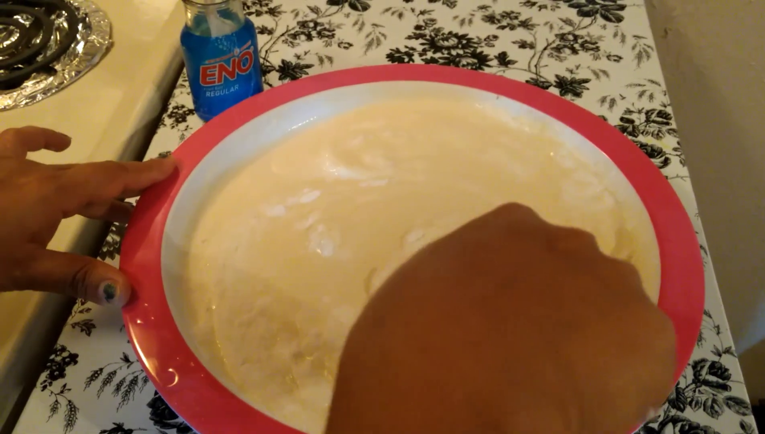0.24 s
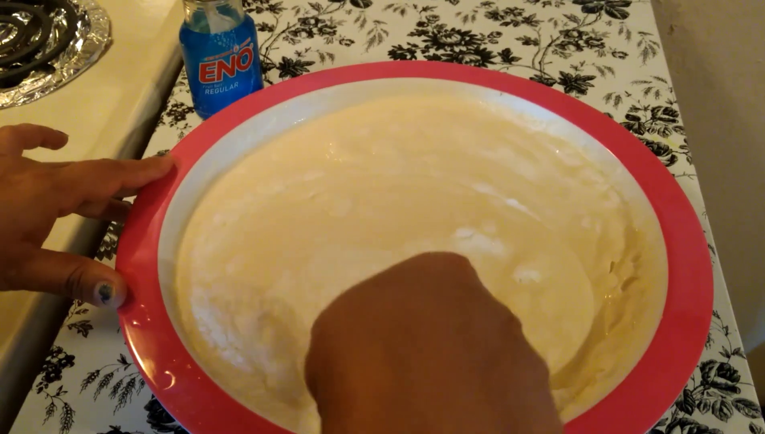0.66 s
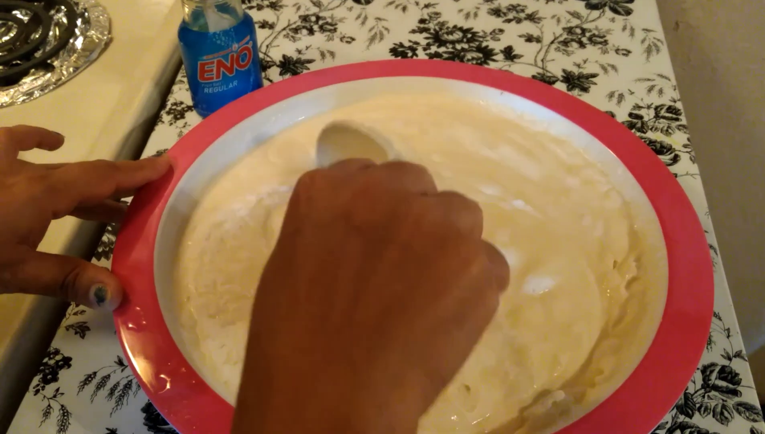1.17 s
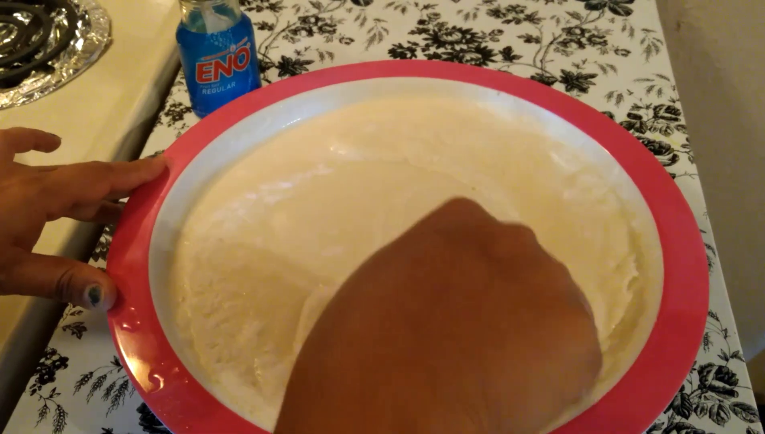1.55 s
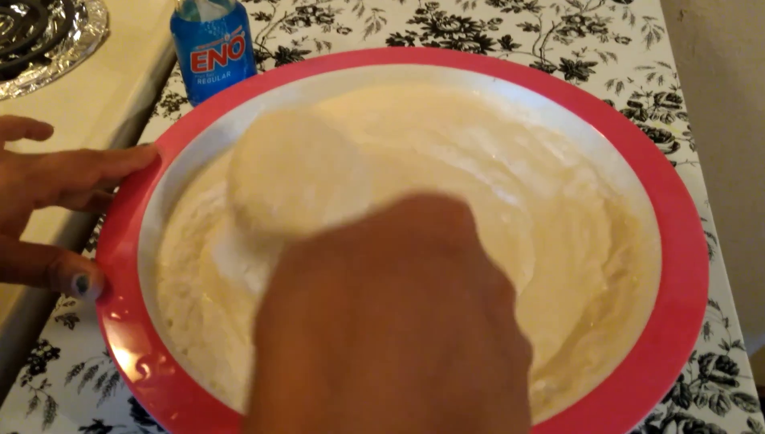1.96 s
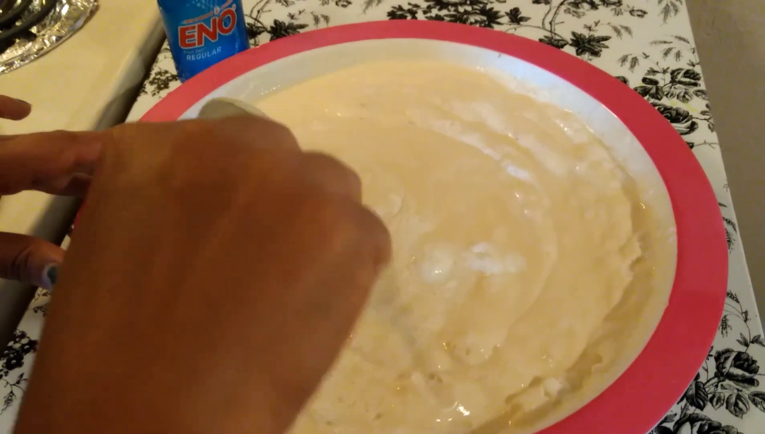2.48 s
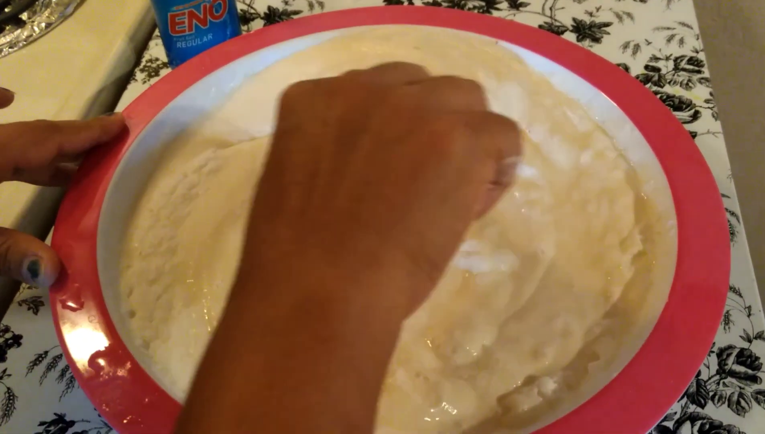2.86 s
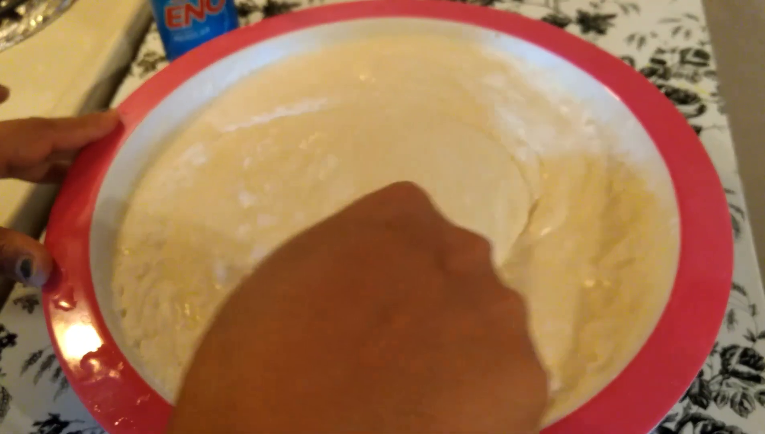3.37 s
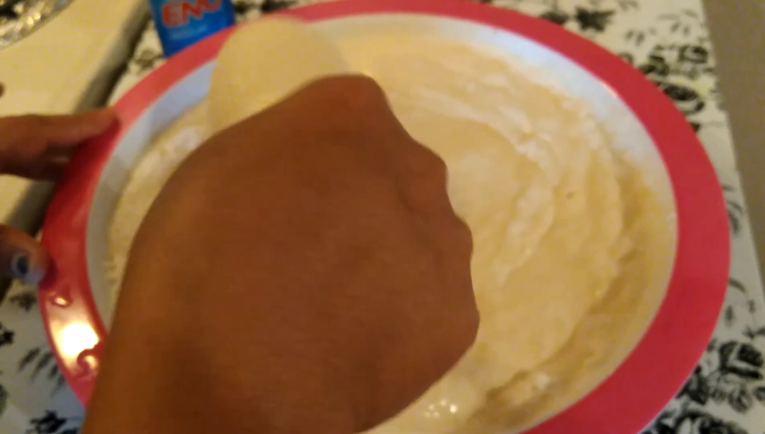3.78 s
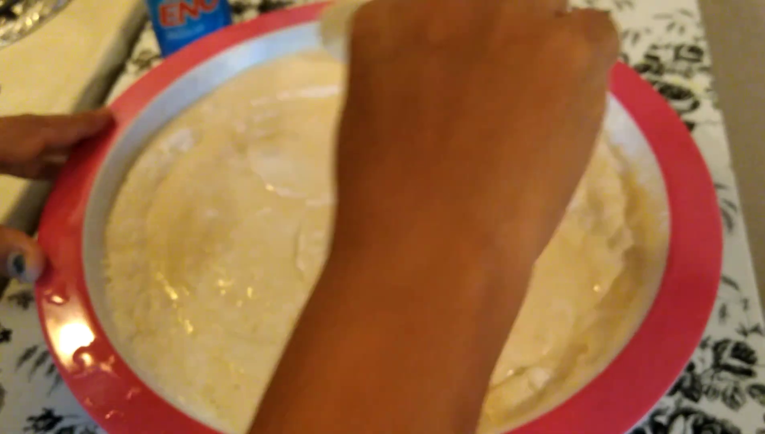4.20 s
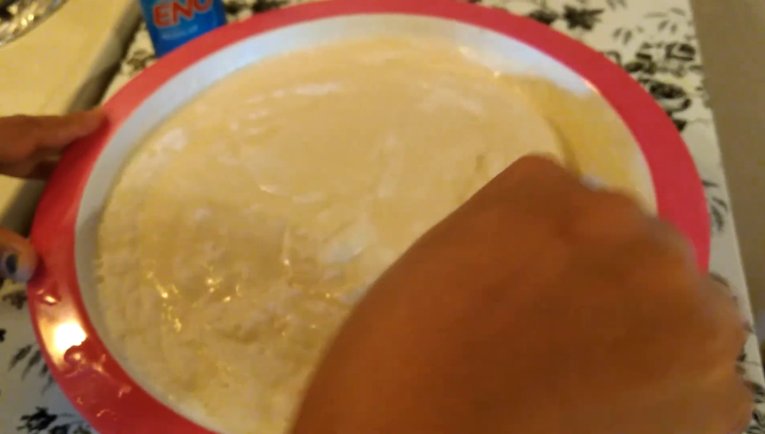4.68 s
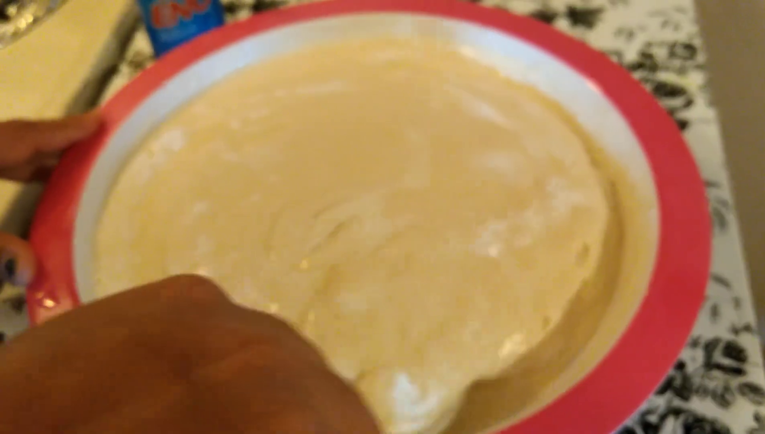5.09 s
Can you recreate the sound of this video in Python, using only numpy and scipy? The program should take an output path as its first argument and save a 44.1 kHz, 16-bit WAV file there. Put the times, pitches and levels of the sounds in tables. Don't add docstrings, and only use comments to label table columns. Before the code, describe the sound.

In a quiet kitchen, a spoon drags and taps along a damped plastic bowl wall while thick batter smears, squelches and fizzes softly. Two heavy knocks, around 1.4 and 2.6 seconds, stand out with short low shudders. Small wet smacks and pops continue to the end, over faint worktop rumble and refrigerator hum, heard close by a small stereo microphone.

```python
import sys
import numpy as np
from scipy import signal
from scipy.fft import rfft, irfft, next_fast_len
from scipy.io import wavfile
from scipy.ndimage import uniform_filter1d, map_coordinates

SR = 44100
rng = np.random.default_rng(int(sys.argv[2]) if len(sys.argv) > 2 else 0)


def persist_wave(psi):
    counts = np.round(np.clip(psi, -1, 1) * 32767).astype(np.int16)
    wavfile.write(sys.argv[1], SR, np.atleast_2d(counts).T)


def voltage_ratio(decibels):
    exponent = np.asarray(decibels, float) / 20
    return 10 ** exponent


N = 235494

# [t/s, peak level/dB, thud f/Hz, hard edge level/dB, shudder T60/s]
BLOWS = [(0.001, -37, 550, -26, 0.39), (0.055, -37, 470, -17, 0.12), (1.367, -21, 480, -11, 0.17),
         (1.414, -33, 438, -18.5, .3), (1.472, -39, 270, -20, .14), (1.628, -44, 315, -10.5, 0.13),
         (2.622, -27.5, 492, -6, 0.24), (3.036, -42, 530, -4.5, 0.36), (3.146, -44, 522, -11.5, 0.22),
         (3.35, -40, 495, -5, 0.17), (4.333, -39, 356, -1.5, .4)]


def rms_one(x):
    return x / np.sqrt(np.mean(x ** 2) + 1e-20)


def filtered(x, hz, kind, order=2):
    return signal.sosfilt(signal.butter(order, hz, kind, fs=SR, output="sos"), x)


def drift(rate):
    coarse = np.arange(0, N + 64, 64)
    smooth = map_coordinates(rng.standard_normal(400), [coarse / SR * rate], order=3)
    return rms_one(np.interp(np.arange(N), coarse, smooth))


def ring(force, hz, t60):
    radius = voltage_ratio(-60 / (t60 * SR))
    angle = 2 * np.pi * hz / SR
    return signal.lfilter([0, np.sin(angle)], [1, -2 * radius * np.cos(angle), radius ** 2], force + 1e-18)


def grains(per_s, spread_db):
    sizes = voltage_ratio(spread_db * np.minimum(rng.exponential(1, N), 3.6)) * rng.choice([-1, 1], N)
    return rms_one(sizes * (rng.random(N) < per_s / SR))


def coloured(sources, spectrum, patchy_db):
    out = 0
    together = drift(9)
    band_edges = 25 * 2 ** np.arange(0, 9.6, .5)
    hz, level = np.transpose(spectrum)
    for k, (low, high) in enumerate(zip(band_edges, band_edges[1:])):
        flicker = patchy_db * (.6 * together + .8 * drift(16))
        if hz[0] < high and low < hz[-1]:
            band = filtered(sources[k % 2], [low, high], "band")
            band_db = np.interp(np.log(low * high) / 2, np.log(hz), level)
            out = out + voltage_ratio(band_db + flicker) * band
    return rms_one(out)


def delayed(x, lag_s):
    size = next_fast_len(N + 256)
    phase = np.exp(-2j * np.pi * np.fft.rfftfreq(size, 1 / SR) * lag_s)
    return irfft(rfft(x, size) * phase, size)[..., :N]


def add(track, s, piece):
    i = max(round(s * SR), 0)
    track[i:i + len(piece)] += piece[:N - i]


def in_time(rows):
    s, *columns = np.transpose(rows)
    return [np.interp(np.arange(N) / SR, s, c) for c in columns]


def pressure():
    # [t/s, pressure level/dB, height on the wall as brightening/dB]
    strokes = [(0.0, -57, 0.5), (0.25, -59, -2.5), (0.5, -66, 0.5), (0.74, -76.5, -4), (0.95, -92, -9),
               (1.38, -83, -6), (1.54, -63.5, -4), (1.75, -70, -1.5), (2.44, -71, -4.5),
               (2.62, -68.5, -3.5), (3.05, -64, 0), (3.34, -58.5, -2), (3.43, -72, -5.5), (3.75, -75, -1.5),
               (4.1, -112, -13), (4.38, -70, -7.5), (4.53, -66.5, 3.5), (5.05, -71, -3.5)]
    lift_off_db_per_s = 49
    press_db, height_db = in_time(strokes)
    since_last_s = np.maximum(np.arange(N) / SR - strokes[-1][0], 0)
    return press_db - lift_off_db_per_s * since_last_s, height_db


def bowl(modes, per_s):
    slips = grains(per_s, spread_db=3.5) * voltage_ratio(drift(55))
    wall = 0
    for k, (hz, db, t60) in enumerate(modes):
        wall = wall + (-1) ** k * voltage_ratio(db) * ring(slips, hz, t60)
    return wall / np.sqrt(uniform_filter1d(wall ** 2, size=3000) + 1e-12)


def wall_body():
    push = np.zeros(N)
    for s, db, *_ in BLOWS:
        add(push, s + 0.0018, voltage_ratio(db - 5) * np.hanning(40) / 20)
    return .8 * ring(push, 328, .05) + .4 * ring(push, 245, .12) - .6 * ring(push, 490, .1)


def crack(edges):
    edges = filtered(edges + 1e-18, 2600, "low")
    lower = 0.8 * ring(edges, 962, 0.016) - 0.63 * ring(edges, 1150, 0.019)
    return lower + 0.47 * ring(edges, 1466, 0.017) + 0.72 * ring(edges, 1900, 0.0056)


def knocks():
    # [t/s, peak level/dB, thud f/Hz, hard edge level/dB]
    taps = [(0.08, -56, 880, 4), (0.121, -61, 428, -10), (0.189, -46.5, 455, -1), (0.223, -56, 423, 7),
            (0.289, -49.5, 1220, -25), (0.314, -45, 1110, -4), (0.329, -45, 607, -2.5),
            (0.359, -42.5, 1020, -8), (0.372, -53, 990, 5.5), (0.414, -48.5, 1150, -5),
            (0.493, -49.5, 950, -1), (0.553, -51, 1100, 7.5), (1.666, -53, 507, -9), (1.975, -58, 570, 9),
            (2.161, -53, 1150, 2.5), (2.793, -45.5, 710, -4), (2.82, -54, 790, -3), (2.976, -52, 345, 3),
            (3.134, -45, 550, -7), (3.161, -47, 485, 2), (3.277, -47, 524, -21), (3.305, -46, 706, -10),
            (4.539, -57, 750, -24), (4.665, -64, 750, 13), (4.777, -70, 560, -13),
            (5.092, -55.5, 1070, 9.5), (5.178, -50.5, 486, 2)]
    blow_shudder_db, tap_shudder_db, tap_t60_s = -14, -15, 0.098
    heavy_from_db, heavy_contact_s = -32, .0006
    hits = [(*blow, blow_shudder_db) for blow in BLOWS]
    hits += [(*tap, tap_t60_s, tap_shudder_db) for tap in taps]
    thuds, edges, deep, middle, high = np.zeros((5, N))
    t = np.arange(SR // 2) / SR
    for s, db, hz, edge_db, t60, shudder_db in hits:
        cycles = hz * (.62 * t + .95 * .004 * (1 - np.exp(-t / .004)))
        swell = (t * hz / 1.5) ** 2 * np.exp(2 - 2 * t * hz / 1.5)
        add(thuds, s + 0.00042, voltage_ratio(db) * swell * np.sin(2 * np.pi * (cycles + rng.random())))
        contact = np.hanning(3 + round(heavy_contact_s * SR) * (db > heavy_from_db))
        add(edges, s + 0.001243, voltage_ratio(db + edge_db) * contact / contact.sum())
        dying = voltage_ratio(db + shudder_db - 60 * t / t60) * (1 - np.exp(-(t / .006) ** 2))
        add(deep, s, voltage_ratio(0.67 * (db + 32.5)) * dying * np.exp(t / 0.31))
        add(middle, s, dying)
        add(high, s, voltage_ratio(edge_db + 5.0) * dying * np.exp(-t / 0.022))
    thuds = filtered(thuds + wall_body(), 170, "high")
    return thuds + crack(edges), deep, middle, high


def drag(press_db, height_db):
    # [f/Hz, level/dB, T60/s]
    deep_modes = [(224, -2, 0.072), (250, -2.5, 0.21), (315, 1, 0.096), (373, -1, 0.025)]
    middle_modes = [(405, 1.5, 0.019), (495, -0.8, 0.071), (553, -3, 0.041), (663, 0, 0.019)]
    high_modes = [(797, 10, 0.023), (962, 7.5, 0.045), (1118, 15, 0.01), (1432, -2, 0.048),
                  (1800, -12, 0.024)]
    strikes, deep, middle, high = knocks()
    deep = deep + voltage_ratio(press_db - height_db - 2.5)
    middle = middle + voltage_ratio(press_db - 2.5)
    high = high + voltage_ratio(press_db + height_db - 2)
    wall = deep * bowl(deep_modes, 700) + middle * bowl(middle_modes, 800) + high * bowl(high_modes, 900)
    return strikes + wall


def smacks():
    # [t/s, peak level/dB, centre f/Hz, length/s]
    wet_smacks = [(0.055, -54, 2430, .049), (0.416, -50, 2600, 0.071), (0.551, -55, 4620, .03),
                  (0.662, -53, 6130, .036), (1.116, -49.5, 6340, 0.013), (1.651, -48, 3920, 0.032),
                  (2.163, -44, 4800, .03), (2.4794, -55, 4170, .022), (2.644, -52, 2550, .025),
                  (2.796, -52, 2980, .04), (3.352, -46, 2290, .025), (3.58, -55, 4280, .017),
                  (4.551, -48.5, 2470, 0.02), (4.744, -53.5, 4590, 0.029), (4.779, -49, 2370, 0.019),
                  (4.8494, -46, 3820, 0.095), (4.947, -59, 4080, 0.027), (5.181, -55, 2600, 0.037)]
    # [t/s, peak level/dB, centre f/Hz, length/s]
    snaps = [
        (1.116, -52, 8120, 0.015),
        (2.162, -52, 8120, 0.016),
        (2.625, -55, 8200, 0.02),
    ]
    # [t/s, peak level/dB, centre f/Hz, length/s]
    pops = [
        (0.0834, -53, 2060, .025),
        (1.5094, -53.5, 2630, .048),
        (2.68, -50, 4600, .025),
        (4.3325, -55, 2600, .04),
        (4.3325, -55, 1980, .03),
        (4.629, -52, 2240, .036),
        (5.0945, -45, 2120, .025),
        (5.101, -53, 2550, .04),
    ]
    out = np.zeros(N)
    t = np.arange(SR // 10) / SR
    for rows, octaves in [(wet_smacks, 1.46), (snaps, 3.4), (pops, .5)]:
        half = 2 ** (octaves / 2)
        for s, db, hz, length, in rows:
            burst = rng.standard_normal(len(t)) * voltage_ratio(-60 * t / length) * (1 - np.exp(-t / .0003))
            burst = filtered(burst, [hz / half, min(hz * half, 19000)], "band")
            add(out, s, voltage_ratio(db + 5) * burst / np.abs(burst).max())
    return out


def batter(press_db, height_db):
    # [t/s, level/dB]
    stir = [(0.0, -65.5), (0.46, -64.5), (0.85, -73.5), (1.4, -72), (1.78, -61.5), (1.96, -66.5),
            (2.57, -67.5), (2.86, -63), (3.4, -67), (3.81, -74), (4.18, -77.5), (4.36, -72), (4.67, -65.5),
            (4.85, -66.5), (5.24, -71.5), (5.34, -73.5)]
    # [f/Hz, level per Hz/dB]
    squelch_spectrum = [(700, -14), (1300, -10), (2200, 10.5), (3000, -6.5), (4200, -9.5)]
    smear_spectrum = [(2000, -7.5), (3500, 1.5), (4600, 17.5), (6500, -9), (9000, -35), (14000, -50)]
    fizz_spectrum = [(2000, -14), (5000, -4.5), (8000, 5.5), (11000, -5), (16000, -4.5)]
    speed_db, = in_time(stir)
    speed_db = speed_db - speed_db.mean()
    squelch_db = -71.5 + 0.32 * speed_db + 0.51 * (press_db + height_db - press_db.mean())
    smear_db = -68 + speed_db
    fizz_db = -64 + 0.71 * speed_db
    coarse = [grains(4000, spread_db=2.0) for side in range(2)]
    fine = [grains(11000, spread_db=2.0) for side in range(2)]
    squelch = voltage_ratio(squelch_db + 2.0) * coloured(coarse, squelch_spectrum, patchy_db=4.0)
    smear = voltage_ratio(smear_db + 0.5) * coloured(coarse, smear_spectrum, patchy_db=2.5)
    fizz = voltage_ratio(fizz_db - 4.5) * coloured(fine, fizz_spectrum, patchy_db=0.5)
    return squelch + smear + fizz


def worktop(press_db):
    jolt_from_db, jolt_rise_s, jolt_t60_s = -40, 0.005, 0.16
    level = voltage_ratio(-64 + 0.31 * (press_db - press_db.mean()) + 3.5 * drift(13))
    t = np.arange(SR // 2) / SR
    rise = 1 - np.exp(-(t / jolt_rise_s) ** 2)
    for s, db, *_ in BLOWS:
        if db > jolt_from_db:
            add(level, s, voltage_ratio(-41.5 + 0.75 * (db + 29.5) - 60 * t / jolt_t60_s) * rise)
    return level * rms_one(filtered(rng.standard_normal(N), [75, 200], "band"))


def kitchen(x, t60):
    t = np.arange(SR // 2) / SR
    echoes = rng.standard_normal((2, len(t))) * voltage_ratio(-60 * t / t60) * (t > .006)
    return signal.fftconvolve(x[None], echoes / np.sqrt(np.sum(echoes[0] ** 2)), axes=1)[:, :N]


def fridge():
    # [f/Hz, level/dB]
    harmonics = [(120.1, -57.5), (240.2, -69.5)]
    # [f/Hz, level per Hz/dB]
    air_spectrum = [(25, -21), (50, -27), (100, 10.5), (200, 4), (500, -4), (1200, -9.5), (2500, -8.5),
                    (6000, -15.5), (10000, -21.5), (16000, -19.5)]
    t = np.arange(N) / SR
    port_phase = np.array([[0], [.12]])
    hum = 0
    for hz, db in harmonics:
        level = voltage_ratio(db + 3.6 * drift(21.97))
        hum = hum + level * np.sin(2 * np.pi * hz * t + 0.81 * drift(14) + port_phase)
    return hum + voltage_ratio(-63) * coloured(rng.standard_normal((2, 2, N)), air_spectrum, patchy_db=0.2)


def scene():
    press_db, height_db = pressure()
    near = drag(press_db, height_db) + smacks() + batter(press_db, height_db) + worktop(press_db)
    return near + voltage_ratio(-9.0) * kitchen(near, t60=0.33) + fridge()


def top_cut(x):
    return signal.sosfilt(signal.butter(12, 15520, fs=SR, output="sos"), x)


def record(dry):
    port_delays = [
        [27 / 48000],
        [18.5 / 48000],
    ]
    shaded = voltage_ratio(1.2) * signal.sosfiltfilt(signal.butter(2, 2000, fs=SR, output="sos"), dry[0])
    ports = np.array([shaded, dry[1]])
    stereo = ports - delayed(ports[::-1], np.array(port_delays))
    stereo = filtered(stereo, 60, "high")
    preamp = rms_one(filtered(rng.standard_normal((2, N)), [35, 95], "band", order=1))
    return top_cut(stereo + voltage_ratio(-78.5) * preamp)


dry = scene()
out = record(dry)
persist_wave(out)
```